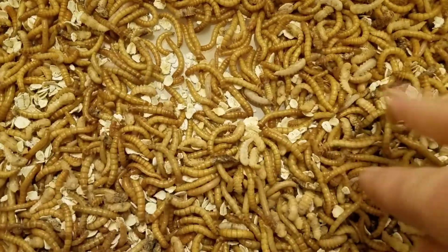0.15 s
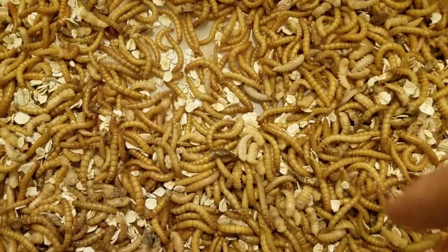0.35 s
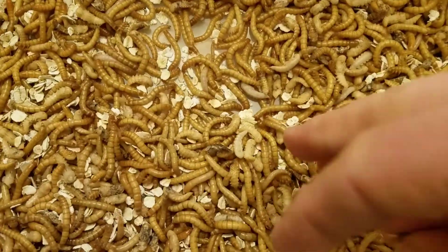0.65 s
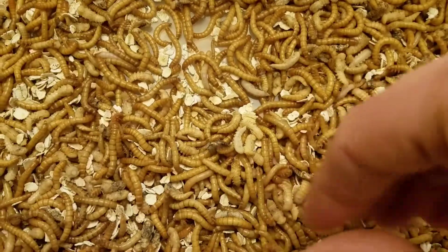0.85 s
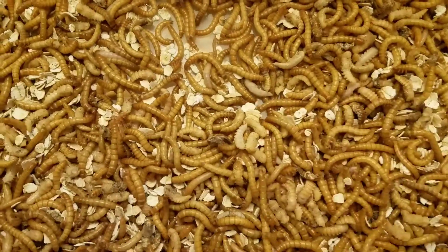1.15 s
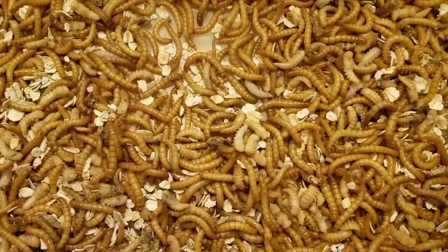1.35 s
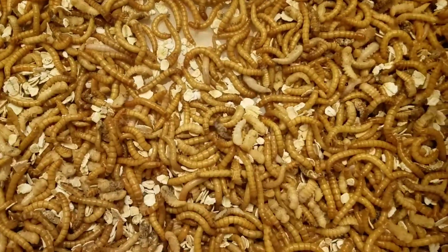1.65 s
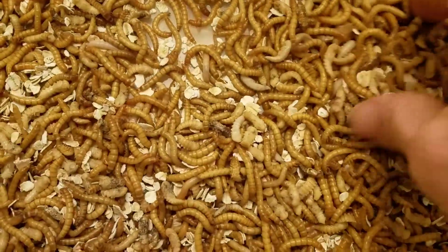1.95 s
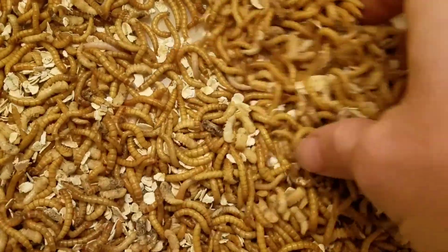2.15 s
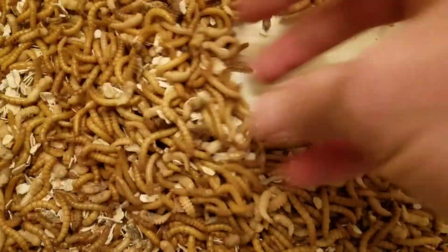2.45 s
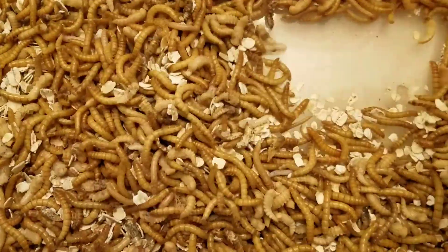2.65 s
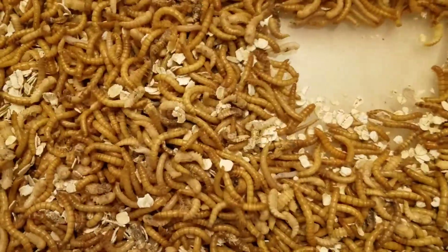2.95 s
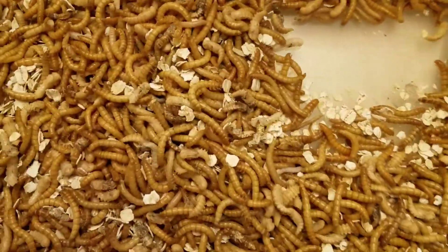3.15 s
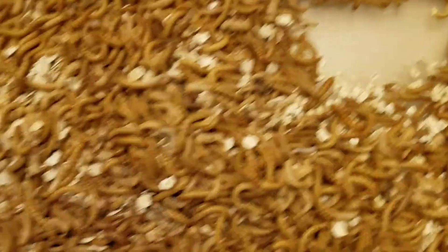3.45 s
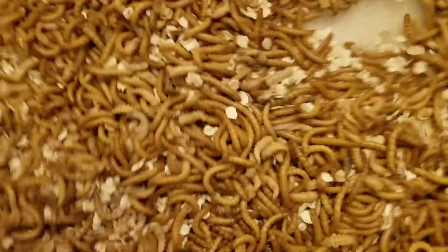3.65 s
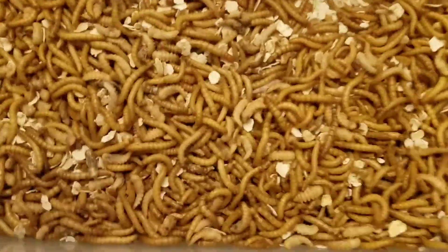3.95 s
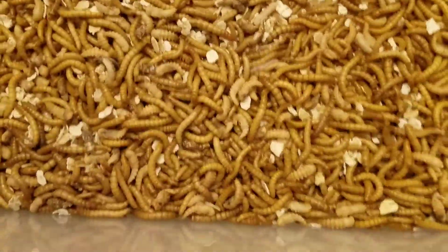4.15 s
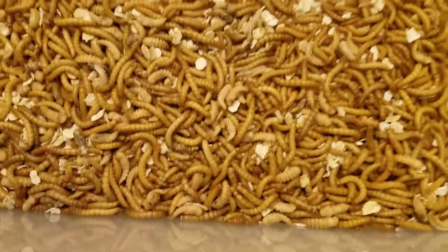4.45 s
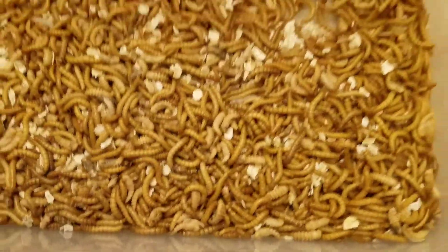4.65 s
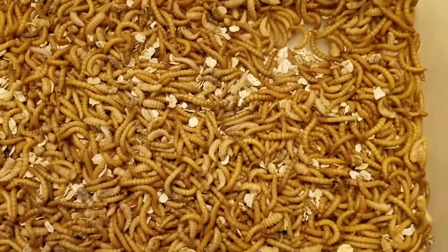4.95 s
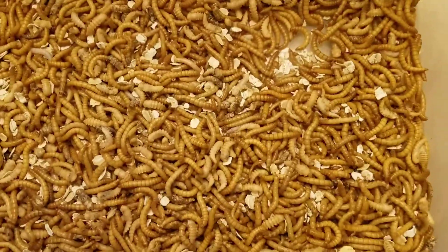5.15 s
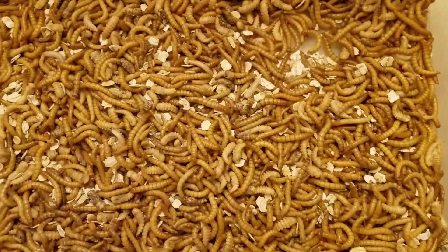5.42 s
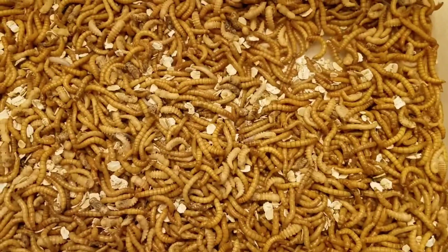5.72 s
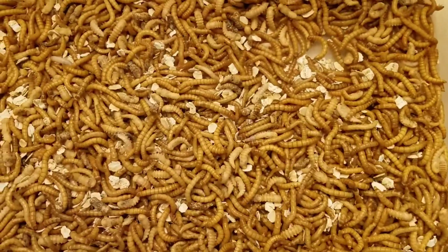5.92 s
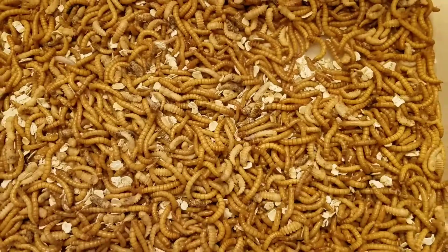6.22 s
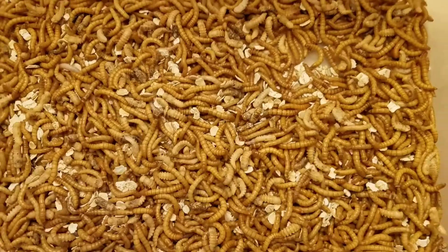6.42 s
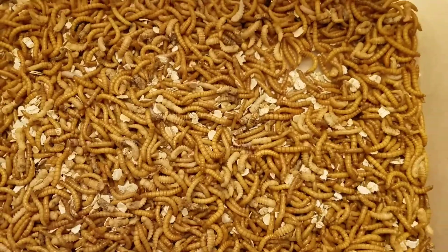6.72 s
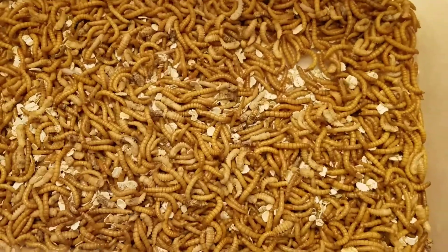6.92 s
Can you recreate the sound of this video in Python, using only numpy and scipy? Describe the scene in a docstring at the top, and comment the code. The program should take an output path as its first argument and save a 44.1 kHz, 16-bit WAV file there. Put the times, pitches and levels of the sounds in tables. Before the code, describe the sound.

Indoors, close stereo microphone, crawling heard slightly to the left. Soft finger strokes and tiny snaps come first, then a short crunchy scoop through dry bedding. Next comes a far louder burst: a load of larvae and flakes slides and rattles in a hollow plastic tub with dull knocks. It stops abruptly, leaving delicate insect rustle, low room hum, sparse ticks and one last small tap.

```python
"""A tub of live mealworms in dry oat flakes, heard from close by in a humming room; the left port faces it.
Throughout, filtered noise makes the machinery rumble and fine random grains make the larvae's steady crackle.
First fingertips brush the bedding, then stir and scoop it: dense grains crunch and smooth ones hiss.
Next the tub is gripped and shaken: noise grains slide in surges, modes ring at knocks, flakes crack.
The load settles; the crawl goes on alone but for a few late cracks and one last light touch."""
import sys
import numpy as np
from scipy import signal
from scipy.fft import rfft, irfft, next_fast_len
from scipy.io import wavfile
from scipy.ndimage import uniform_filter1d

SR = 44100
rng = np.random.default_rng(int(sys.argv[2]) if len(sys.argv) > 2 else 0)


def bounce(signal):
    """Save signal as a 16-bit WAV file at the path given by the first command-line argument."""
    frames = np.transpose(np.atleast_2d(signal))
    limited = np.clip(frames, -1, 1)
    pcm = np.round(limited * 32767).astype(np.int16)
    wavfile.write(sys.argv[1], SR, pcm)


N = 312218
SIZE = next_fast_len(N + SR // 2)      # transform length, with room for filter tails
HZ = np.maximum(np.arange(SIZE // 2 + 1) * SR / SIZE, 1)


def from_db(db):
    """Decibel law: 20 dB is a tenfold amplitude."""
    return 10 ** (np.asarray(db) / 20)


def in_time(rows):
    """Envelope: levels in dB joined by straight lines, silent outside their span."""
    s, db = np.transpose(rows)
    return np.interp(np.arange(N) / SR, s, db, left=-150, right=-150)


def at_hz(points):
    """Logarithmic frequency scale: values joined by straight lines over log frequency."""
    hz, value = np.transpose(points)
    return np.interp(np.log(HZ), np.log(hz), value)


def drift(rate_hz):
    """Low-passed noise: a slow random curve of spread 1, from a double pole at the given rate."""
    step = 40      # samples between computed points
    pole = np.exp(-2 * np.pi * rate_hz * step / SR)
    noise = rng.standard_normal(N // step + 2002)
    slow = signal.lfilter([1], [1, -2 * pole, pole * pole], noise)[2000:]      # run-in dropped
    return np.interp(np.arange(N) / step, np.arange(len(slow)), slow / slow.std())


def colour(pair, spectrum, facing, likeness, peaks=()):
    """Minimum-phase filtering and stereo coherence: two signals take on a spectrum and reach two ports."""
    level_db = at_hz(spectrum)
    for hz, width, db in peaks:
        level_db = level_db + db / (1 + (2 * (HZ - hz) / width) ** 2)
    cepstrum = irfft(level_db * np.log(10) / 20, SIZE)
    cepstrum[1:SIZE // 2] *= 2      # folding gives minimum phase
    cepstrum[SIZE // 2 + 1:] = 0
    mean_power = np.mean(from_db(2 * level_db))
    tone = np.exp(rfft(cepstrum)) / np.sqrt(mean_power)
    alike = np.clip(at_hz(likeness), -.97, .97)
    shared, apart = rfft(pair, SIZE) * tone * np.sqrt([1 + alike, 1 - alike])
    lean = from_db(at_hz(facing) / 2)      # half of the difference to each port
    ports = irfft([(shared + apart) * lean, (shared - apart) / lean], SIZE)[:, :N]
    return ports / np.cosh(np.log(lean)).mean()


def grains(per_s, spread_db, clump_db, clump_rate, grain_ms):
    """Shot noise: tiny contacts at random moments, with drifting size, set the power of noise bursts."""
    born = rng.random(N) < per_s / SR
    scatter_db = spread_db * np.minimum(rng.exponential(1, N), 5)
    sizes = from_db(scatter_db + clump_db * drift(clump_rate))
    decay = np.exp(-1000 / (grain_ms * SR))      # power falls to 1/e in grain_ms
    power = signal.lfilter([1], [1, -decay], born * sizes ** 2 + 1e-12)
    return np.sqrt(power / power.mean()) * rng.standard_normal((2, N))


def swells(start, length, db, rise, t60):
    """Attack and exponential decay: summed gain of events that swell over a share of their length."""
    t = np.arange(N) / SR
    total = 0
    for s, n, d in zip(start, length, db):
        attack = np.clip((t - s) / (n * np.clip(rise, .05, 1)), 0, 1) ** 2
        decay_db = 60 * np.clip((t - s - n) / t60, 0, 3)      # begins after the length is over
        total = total + from_db(d - decay_db) * attack
    return total


# Room and bedding: (frequency [Hz], left-right likeness [-1 to 1])
LIKENESS = [(60, 1), (130, 1), (290, 0.96), (640, 0.5), (1410, -0.19), (3100, 0.1), (6820, -0.038),
            (15000, 0.059)]
# Far and steady sounds: (frequency [Hz], left minus right [dB])
FACING = [(60, 1.5), (150, -1), (380, 1), (950, 1), (2380, 7), (5980, 7), (15000, -1)]
# Spectrum of the machinery rumble: (frequency [Hz], relative level [dB])
ROOM_SPECTRUM = [(12, -8.5), (20, -36), (64, -14), (75, -13), (97, -4.5), (111, -7.5), (129, -1),
                 (160, -8.5), (216, -10), (247, -5), (358, -13.5), (476, -20.5), (633, -27), (962, -29),
                 (1100, -52), (1430, -68), (2420, -120)]
# Low room resonances: (frequency [Hz], width [Hz], height above surroundings [dB])
HUM_PEAKS = [(129.3, 35, 6.5), (241, 10.7, 5), (463.4, 9.4, 10), (574, 13.3, 12)]
ROOM_DB = -46      # gain of the coloured noise


def room():
    """Room resonance: wavering machinery rumble is reinforced at the room's low modes."""
    air = rng.standard_normal((2, N)) * from_db(.9 * drift(2.5))
    return from_db(ROOM_DB) * colour(air, ROOM_SPECTRUM, FACING, LIKENESS, HUM_PEAKS)


# Spectrum of the crawling: (frequency [Hz], relative level [dB])
CRAWL_SPECTRUM = [(410, -18), (700, 0), (958, -7.5), (1120, 0), (1360, -6), (1480, -1.5), (1660, -3),
                  (2330, -5.5), (3600, -13), (6650, -16.5), (8100, -7.5), (10100, -21.5), (15200, -24),
                  (16000, -34)]
# Spectrum of fine hard contacts, also heard in the shaken load: (frequency [Hz], relative level [dB])
GRIT_SPECTRUM = [(2350, -43), (4000, -2.5), (6470, -9.5), (7930, 3.5), (8400, 1), (10700, -15.5),
                 (13100, -19), (15100, -18), (16000, -18)]
CRAWL_DB, TICKS_DB = -56.5, -19      # gain of the whole crawl; ticks against the even hiss


def larvae():
    """Superposition of contacts: countless legs blur into an even hiss, with sparse ticks on flakes."""
    blur = grains(12000, spread_db=1.5, clump_db=.5, clump_rate=14, grain_ms=.6)
    ticks = grains(25, spread_db=3.0, clump_db=1.0, clump_rate=4, grain_ms=.8)
    ticks = from_db(TICKS_DB) * colour(ticks, GRIT_SPECTRUM, FACING, LIKENESS)
    peaks = [(1252, 41, 8.1), (8860, 2600, 1.7)]      # (frequency [Hz], width [Hz], height [dB])
    even = colour(blur, CRAWL_SPECTRUM, FACING, LIKENESS, peaks)
    return from_db(CRAWL_DB) * (even + ticks)


# Fingers pushing flakes aside: (time [s], level [dB])
STIR = [(0, -59), (.1, -63.5), (1.05, -74), (1.56, -82), (1.6, -60), (1.75, -53.5), (1.86, -43),
        (1.92, -51), (2.05, -49), (2.2, -42), (2.32, -41), (2.36, -51), (2.45, -54), (3.05, -67.5)]
# Separate light fingertip strokes: (start [s], length [s], skin hiss level [dB], crunch level [dB])
STROKES = [(.02, 0.057, -73, -76), (0.139, 0.15, -52.5, -70), (0.601, 0.07, -57, -80),
           (0.814, 0.1, -48.5, -68), (1.068, .06, -66, -49.5), (2.505, .1, -56.5, -76),
           (2.625, 0.044, -65, -53.5), (2.67, 0.1, -61, -84), (6.792, 0.054, -62, -56),
           (6.868, 0.033, -60, -65)]
# Spectrum of crunching flakes: (frequency [Hz], relative level [dB])
FLAKES_SPECTRUM = [(210, -33.5), (350, -0.5), (640, -1.5), (686, 2), (1050, -9), (1250, 0), (1680, -6),
                   (2080, -4.5), (5320, -12.5), (8220, -6.5), (10000, -25), (13000, -51), (22000, -120)]
# Spectrum of the skin hiss: (frequency [Hz], relative level [dB])
BRUSH_SPECTRUM = [(2350, -70), (4000, 1), (4840, 6.5), (5220, -1.5), (8550, 17), (11400, 3.5), (12700, 4),
                  (14900, 7), (16000, -73)]
# The hand: (frequency [Hz], left minus right [dB])
FACING_HAND = [(60, 0.5), (150, -0.5), (380, 0), (950, 6), (2380, 9), (5980, 5.5), (15000, -2.5)]
SKIN_DB, STIR_FULL_DB = -45.5, -40.5      # skin hiss level when the stir is at its full level
SKIN_FOLLOWS = 1.24      # dB of hiss per dB of stir
STROKE_RISE, STROKE_T60_S = 0.34, 0.082   # share of length spent swelling; dying away after the lift


def hand():
    """Granular friction: pushed flakes crunch densely while fingertips hiss smoothly."""
    stir_db = in_time(STIR)
    start, length, hiss_db, crunch_db = np.transpose(STROKES)
    skin_db = SKIN_DB + SKIN_FOLLOWS * (stir_db - STIR_FULL_DB)
    pushed = from_db(stir_db) + swells(start, length, crunch_db, STROKE_RISE, STROKE_T60_S)
    brushing = from_db(skin_db) + swells(start, length, hiss_db, STROKE_RISE, STROKE_T60_S)
    crunch = grains(3500, spread_db=3.0, clump_db=1.5, clump_rate=30, grain_ms=.7)
    hiss = grains(12000, spread_db=1.2, clump_db=.8, clump_rate=40, grain_ms=.4)
    return (pushed * colour(crunch, FLAKES_SPECTRUM, FACING_HAND, LIKENESS)
            + brushing * colour(hiss, BRUSH_SPECTRUM, FACING_HAND, LIKENESS))


# Single flakes cracking, peaks ahead of the mix to the ports:
# (time [s], body peak [dB], body pitch [Hz], bright edge peak [dB])
SNAPS = [(0.776, -54, 1230, -49), (1.0892, -34, 2550, -27.5), (1.1067, -38.5, 2470, -40),
         (1.124, -50, 2500, -42), (1.1934, -47, 1240, -34), (1.213, -50, 1240, -45),
         (1.3054, -50, 2500, -44), (1.772, -40.5, 2060, -38.5), (1.8613, -35, 2030, -52),
         (1.8738, -29, 1260, -51), (1.9796, -30.5, 1950, -42), (2.0388, -35, 1140, -42),
         (2.147, -30.5, 1630, -30.5), (2.3343, -35, 1460, -39), (2.4507, -41.5, 2040, -31.5),
         (2.4998, -39.5, 3040, -36), (2.5133, -43, 1300, -28), (2.628, -39, 1120, -58),
         (2.6568, -37.5, 2090, -54), (2.908, -55, 2500, -45), (3.0803, -31, 1330, -43),
         (3.1242, -34.5, 2560, -37), (3.1703, -35, 1390, -37.5), (3.219, -40, 1120, -59),
         (3.391, -16, 2680, -27), (3.42, -20, 2500, -33), (3.4894, -17, 1200, -18),
         (3.5771, -13.5, 1170, -25), (3.648, -8.5, 1650, -10), (3.6892, -12, 1090, -26),
         (3.7308, -14, 2760, -19), (3.7632, -23, 3950, -17), (3.787, -17, 1260, -30),
         (3.823, -15, 1140, -21), (3.8712, -19, 1090, -32), (3.8809, -12.5, 1390, -17),
         (3.9407, -32, 1610, -46), (4.083, -41, 4120, -49), (4.094, -32, 2570, -47),
         (4.1951, -28, 2510, -33), (4.2042, -23.5, 2580, -27.5), (4.293, -38.5, 2130, -58),
         (5.8315, -56, 1230, -35), (6.21, -44, 2500, -36), (6.804, -38.5, 2250, -55),
         (6.8206, -40, 2000, -57), (6.9174, -26.5, 1590, -60)]
# The shaken tub: (frequency [Hz], left minus right [dB])
FACING_TUB = [(60, 4), (150, 13), (380, 4.5), (950, 4), (2380, 12), (5980, 10), (15000, 0.5)]
# Tub walls, in opposed phase in the middle range: (frequency [Hz], left-right likeness [-1 to 1])
LIKENESS_TUB = [(60, 0.58), (99, 1), (160, 0.9), (270, 0.68), (450, 1), (740, 0.08), (1220, -0.45),
                (2010, -0.52), (3330, -0.3), (5500, 0.24), (9080, -0.037), (15000, -0.11)]
SNAP_T60_S, EDGE_T60_S = 0.02, 0.01      # decay of the noise behind body and edge


def snaps():
    """Brittle fracture: each crack is a dying noise burst, a body near its pitch and a bright edge."""
    out, t = np.zeros((2, N + SR)), np.arange(SR // 10) / SR
    edge_band = signal.butter(2, [5800, 9600], "band", fs=SR, output="sos")
    t60 = np.array([SNAP_T60_S, EDGE_T60_S])[:, None, None]
    for s, body_db, hz, edge_db in SNAPS:
        burst = rng.standard_normal((2, 2, len(t))) * from_db(-60 * t / t60)
        body_band = signal.butter(2, [hz / 1.4, hz * 1.3], "band", fs=SR, output="sos")
        body = signal.sosfilt(body_band, burst[0])
        edge = signal.sosfilt(edge_band, burst[1]) + 0.16 * burst[1]
        at = round(s * SR)
        for part, db in ((body, body_db), (edge, edge_db)):
            out[:, at:at + len(t)] += from_db(db) * part / np.abs(part).max(axis=1, keepdims=True)
    flat = [(100, 0), (16000, 0)]      # (frequency [Hz], level [dB])
    return colour(out[:, :N], flat, FACING_TUB, LIKENESS_TUB)


# Knocks on the tub, peaks ahead of the bass cut:
# (time [s], peak [dB], pitch favoured by the contact [Hz])
KNOCKS = [(1.094, -34, 410), (2.649, -28, 139), (2.659, -23.5, 163), (3.080, -23.5, 495), (3.128, -21, 152),
          (3.171, -16, 184), (3.22, -20, 148), (3.455, -17.5, 135), (3.473, -20, 250), (3.575, -28, 480),
          (3.635, -11, 140), (3.651, -4.5, 167), (3.668, -27, 256), (3.68, -9.5, 570), (3.790, -9, 694),
          (3.812, -24.5, 397), (3.832, -19.5, 396), (3.881, -15, 530), (4.195, -27.5, 417),
          (4.205, -19.5, 434), (4.209, -21.5, 163), (6.807, -37.5, 500), (6.917, -29.5, 600),
          (6.922, -30, 140)]
# Modes of the tub: (frequency [Hz], relative level before the contact's weighting [dB], t60 [s])
TUB_MODES = [(142, -3.5, 0.036), (172, -14.5, 0.054), (241, -1.5, 0.029), (367, -0.5, 0.039),
             (510, 7.5, 0.026), (765, 2, 0.04), (1156, 9, 0.049)]


def knocks():
    """Modal excitation: a rounded push rings the tub's modes, those near the favoured pitch most."""
    out, t = np.zeros(N + SR), np.arange(SR // 5) / SR
    mode_hz, mode_db, t60 = np.transpose(TUB_MODES)[:, :, None]
    for s, db, hz in KNOCKS:
        off_db = 16 * np.abs(np.log2(mode_hz / hz))      # 16 dB per octave away from the favoured pitch
        weight_db = mode_db - off_db + rng.normal(0, 1.5, mode_hz.shape)
        modes = from_db(weight_db - 60 * t / t60) * np.sin(2 * np.pi * mode_hz * t)
        ring = modes.sum(axis=0)
        ring *= 1 - np.exp(-t * hz * 3.6)      # the push builds over part of a cycle
        at = round(s * SR)
        out[at:at + len(t)] += from_db(db) * ring / np.abs(ring).max()
    bass_cut = signal.butter(2, 85, "high", fs=SR, output="sos")      # the microphone passes little deep bass
    return signal.sosfilt(bass_cut, out[:N]) * from_db([[1.2], [-1.2]])      # left, right


# Tub shaken, then the load settles: (time [s], sliding load level [dB])
SHAKE = [(3.27, -67), (3.314, -55.5), (3.388, -30.5), (3.48, -28), (3.598, -21.5), (3.622, -33.5),
         (3.654, -19), (3.722, -27), (3.755, -28.5), (3.795, -23.5), (3.815, -28), (3.836, -25.5),
         (3.858, -35), (3.884, -27.5), (3.902, -39.5), (4.072, -57.5), (4.088, -42.5), (4.11, -71),
         (4.28, -57), (4.345, -53), (4.4, -68)]
# Spectrum of the sliding load: (frequency [Hz], relative level [dB])
LOAD_SPECTRUM = [(180, -34), (300, -8), (494, -5.5), (1000, -11), (1130, -5), (1510, -13), (1930, -5),
                 (3380, -17.5), (5500, -16.5), (7150, -18.5), (12100, -120)]
# Wall resonances: (frequency [Hz], width [Hz], height above surroundings [dB])
WALL_PEAKS = [(500, 27, 1.3), (795, 110, 10.4), (1135, 31, 8.6), (1330, 114, 9.6), (1628, 26, 12.2),
              (1840, 68, 1.4), (2740, 270, 9.8), (3900, 140, 4.5), (4400, 190, 5.8)]
# Spectrum of the flexing walls: (frequency [Hz], relative level [dB])
RUMBLE_SPECTRUM = [(15, -43), (25, -25), (155, -1.5), (237, -3), (281, -17.5), (333, -11.5), (404, -14),
                   (450, -5), (580, -29.5), (990, -120)]
GRIT_BELOW_DB, RUMBLE_BELOW_DB = 5.5, 10   # under the sliding load
FLEX_BELOW_DB, FLEX_T60_S = 12.5, 0.12     # flexing after a knock: under the knock's peak; decay
LOOSE_DB = -37      # load level above which the walls flex freely


def shake():
    """Granular flow and forced vibration: the load slides in surges and rattles the walls."""
    load = from_db(in_time(SHAKE))
    knock_s, knock_db, _ = np.transpose(KNOCKS)
    grit = load * from_db(-GRIT_BELOW_DB)
    freedom = np.minimum(load / from_db(LOOSE_DB), 1)
    flex_length = np.full(len(knock_s), .006)      # seconds, all spent swelling
    flex = freedom * swells(knock_s, flex_length, knock_db - FLEX_BELOW_DB, 1, FLEX_T60_S)
    rumble = load * from_db(-RUMBLE_BELOW_DB) + flex
    lumps = grains(1400, spread_db=3.3, clump_db=3.0, clump_rate=40, grain_ms=2.0)
    fines = grains(2000, spread_db=3.6, clump_db=3.0, clump_rate=30, grain_ms=.7)
    flexing = grains(300, spread_db=3.0, clump_db=3.5, clump_rate=20, grain_ms=3.0)
    return (colour(load * lumps, LOAD_SPECTRUM, FACING_TUB, LIKENESS_TUB, WALL_PEAKS)
            + colour(grit * fines, GRIT_SPECTRUM, FACING_TUB, LIKENESS_TUB)
            + colour(rumble * flexing, RUMBLE_SPECTRUM, FACING, LIKENESS))


def scene():
    """Linear superposition: all sources add at the two ports."""
    return room() + larvae() + hand() + snaps() + knocks() + shake()


SQUEEZE_FROM_DB, SQUEEZE_SHARE = -25, 0.21      # gain control: threshold; dB of cut per dB above it
RECOVER_DB_PER_S, CUTOFF_HZ = 6, 15800


def record(dry):
    """Gain control and saturation: loud sound sinks the gain, peaks are rounded, the top is cut steeply."""
    power = uniform_filter1d((dry ** 2).mean(axis=0), size=882)      # 20 ms mean
    level_db = 10 * np.log10(power + 1e-12)
    wanted_db = SQUEEZE_SHARE * np.maximum(level_db - SQUEEZE_FROM_DB, 0)
    ramp = RECOVER_DB_PER_S * np.arange(N) / SR
    cut_db = np.maximum.accumulate(wanted_db + ramp) - ramp      # cut rises at once, recovers slowly
    squeezed = dry * from_db(-uniform_filter1d(cut_db, size=441))      # cut smoothed over 10 ms
    rounded = .95 * np.tanh(squeezed / .95)
    low_pass = signal.ellip(12, .5, 90, CUTOFF_HZ, fs=SR, output="sos")
    return signal.sosfilt(low_pass, rounded)


dry = scene()
out = record(dry)
bounce(out)
```